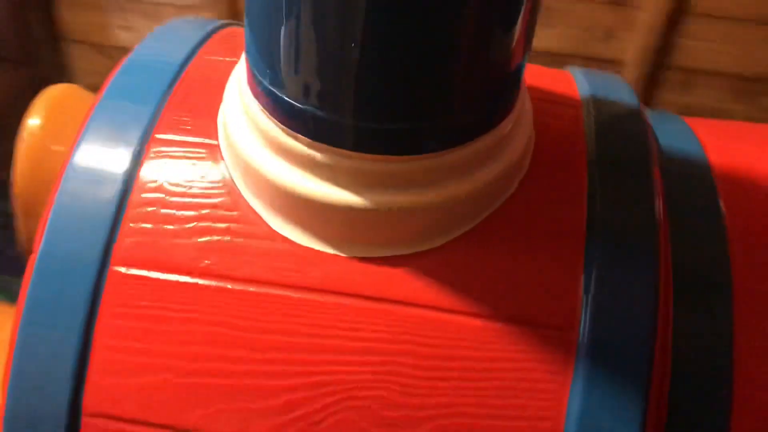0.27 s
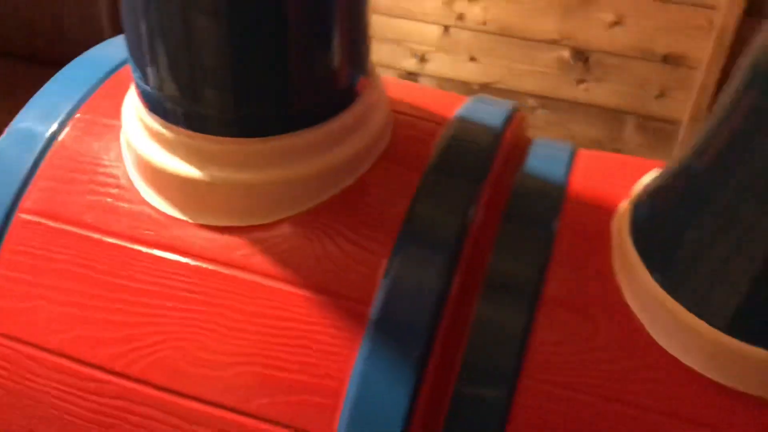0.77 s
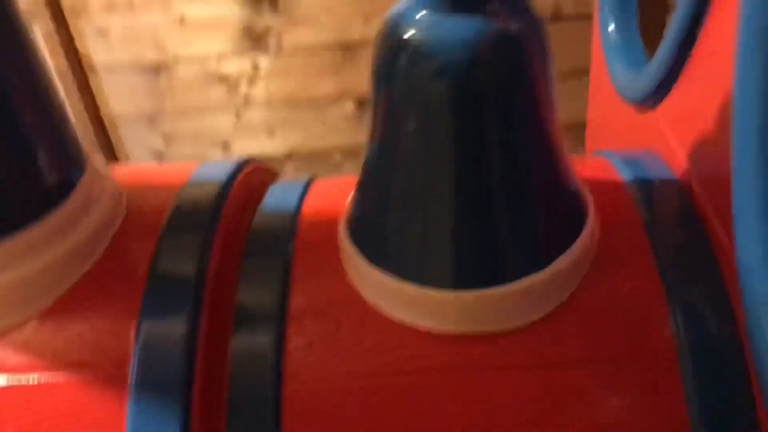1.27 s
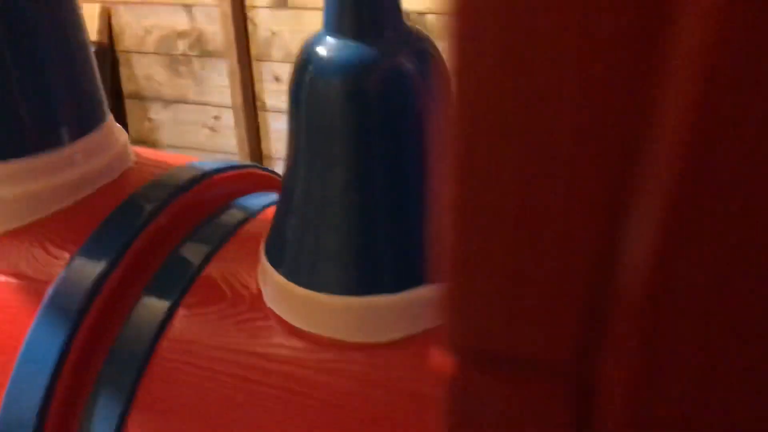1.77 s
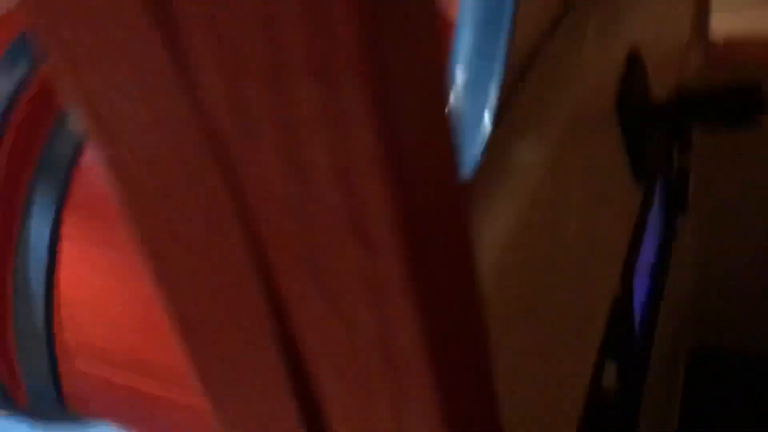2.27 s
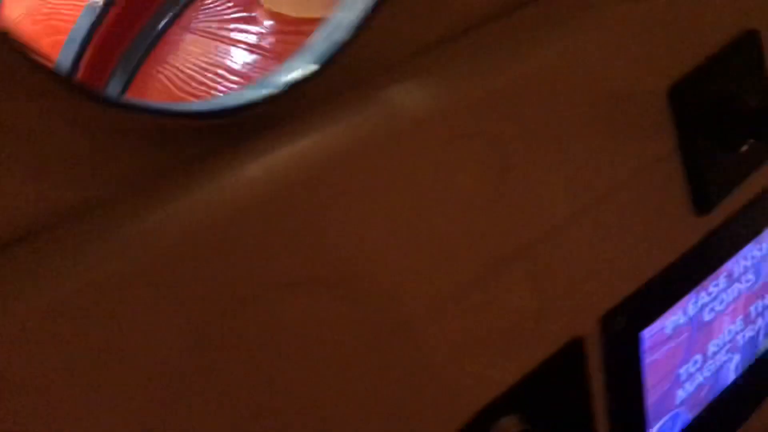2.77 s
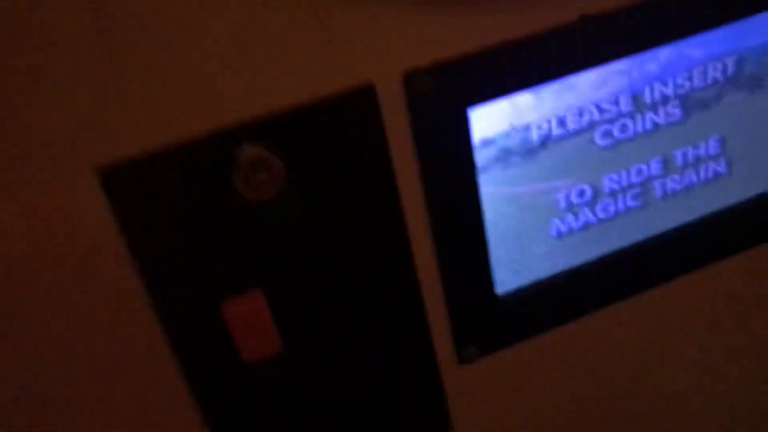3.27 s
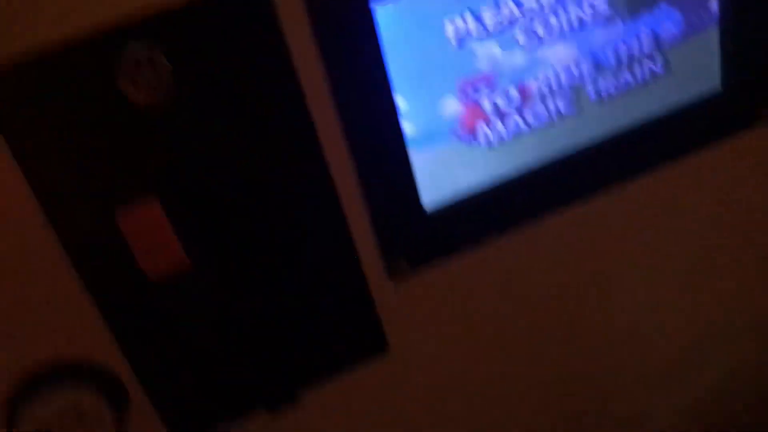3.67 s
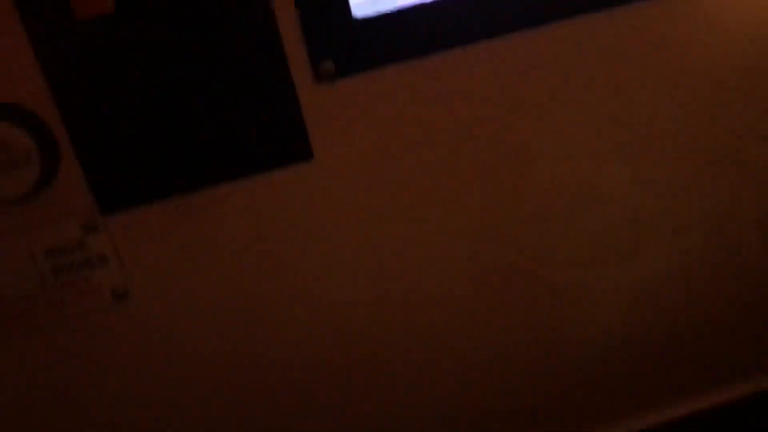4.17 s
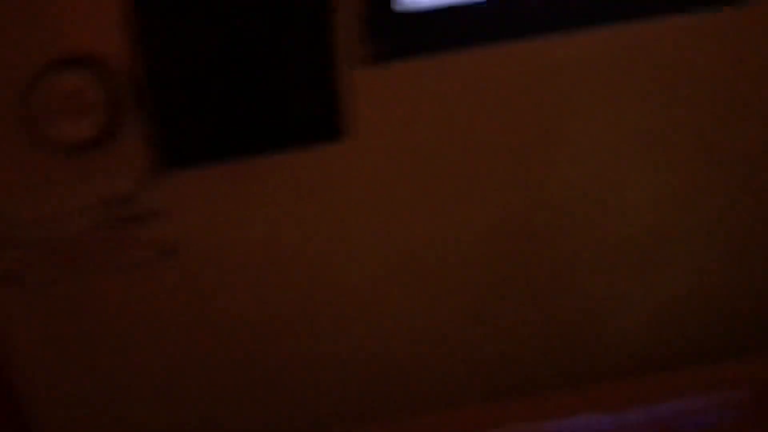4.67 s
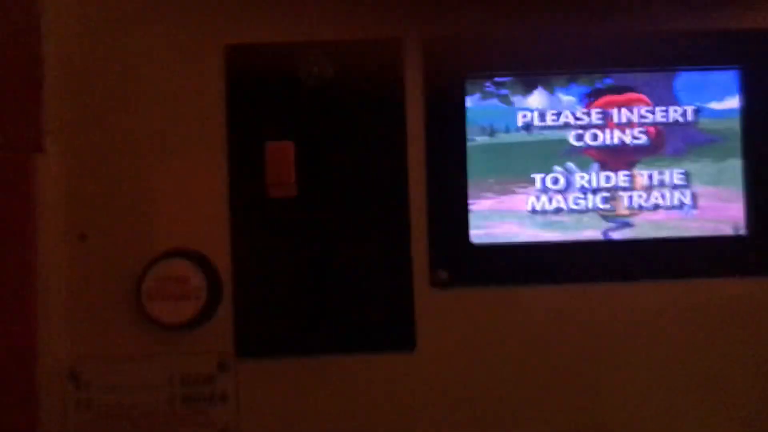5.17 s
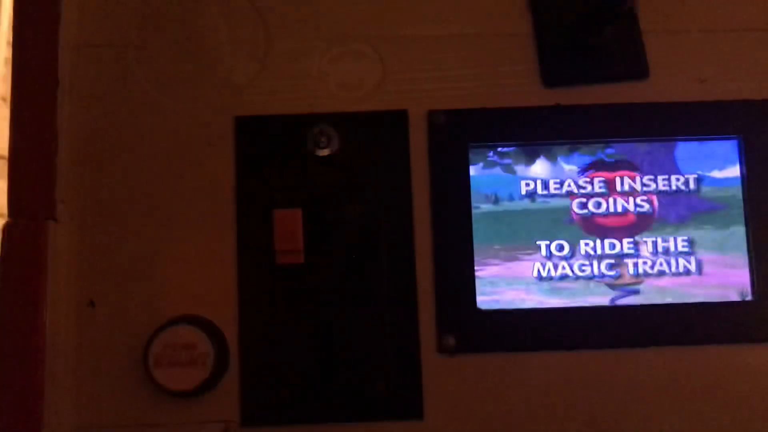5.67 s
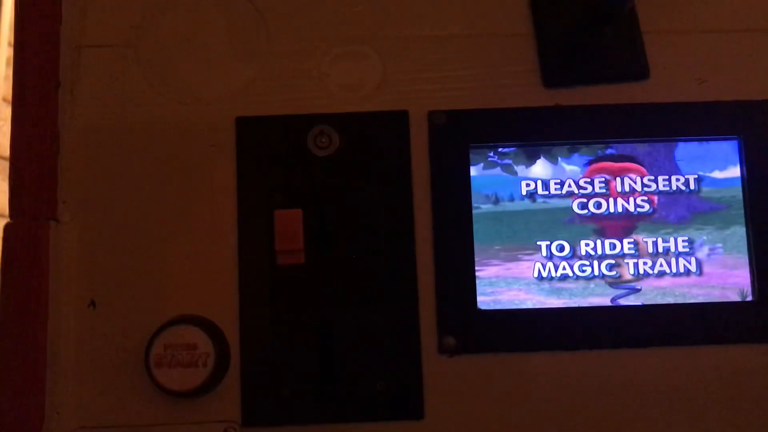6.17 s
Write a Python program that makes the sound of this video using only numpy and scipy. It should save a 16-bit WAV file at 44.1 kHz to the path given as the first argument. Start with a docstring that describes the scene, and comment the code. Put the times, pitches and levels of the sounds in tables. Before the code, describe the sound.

Close, hand-held indoor sound: irregular muffled footfalls with brisk hissing scuffs and small dry ticks over low handling rumble. The steps stop around halfway, leaving soft rubbing, a steady low mains hum and a tiny tap. Then a hollow plastic body is bumped several times, boomy and quickly damped, and struck once very hard with a bright click. It ends in quiet hum and airy hiss with faint slides.

```python
"""Someone walks round a hollow plastic ride in a wooden shed and climbs into its cab.
At first soles hiss and rub (flickering noise bands) and thud on the boards (dying sines with a crunch),
clothes rustle, dry ticks are noise bursts, and a low rumble and quiet air lie beneath.
A faint mains hum of steady tones grows clearer; a light falling-pitch tap comes through the plastic.
Then the shell is knocked, with two more taps among the knocks: its wall modes ring, loose parts rattle
and hands damp them. At the end a few faint slides, the hum and the air are left."""
import sys
import numpy as np
from scipy import signal
from scipy.fft import rfft, irfft, next_fast_len
from scipy.io import wavfile

SR = 44100
rng = np.random.default_rng(int(sys.argv[2]) if len(sys.argv) > 2 else 0)


def wav_record(signal):
    """Record a signal, one row per channel, as 16-bit PCM in the file named by sys.argv[1]."""
    frames = np.transpose(np.atleast_2d(signal))
    bounded = np.clip(frames, -1, 1)
    # unit amplitude maps onto the largest positive 16-bit level
    quanta = np.round(bounded * 32767).astype(np.int16)
    wavfile.write(sys.argv[1], SR, quanta)


N = 283254
HIT_S = .45   # time allowed for one step or knock


def from_db(db):
    """Decibels to gain."""
    return 10 ** (np.asarray(db) / 20)


def rms_one(x):
    """Scale to rms 1."""
    return x / np.sqrt(np.mean(x ** 2) + 1e-20)


def level(rows):
    """Gain in time, straight in decibels between (start_s, level_db) rows."""
    start_s, level_db = np.transpose(rows)
    return from_db(np.interp(np.arange(N) / SR, start_s, level_db))


def bandpass(x, low_hz, high_hz):
    """Keep the sound between two pitches."""
    return signal.sosfilt(signal.butter(2, [low_hz, high_hz], "band", fs=SR, output="sos"), x)


def drift(rate_hz):
    """Slow chance with spread 1: noise through a smooth low-pass, drawn at every 40th sample."""
    step = 40
    pole = np.exp(-2 * np.pi * rate_hz * step / SR)
    white = rng.standard_normal(N // step + 2002)
    slow = signal.lfilter([1], [1, -2 * pole, pole * pole], white)[2000:]   # skip the start-up
    return np.interp(np.arange(N) / step, np.arange(len(slow)), rms_one(slow))


def coloured(spectrum, patchy_db, rate_hz):
    """Noise in narrow bands, flickering partly together and partly each alone; rms 1."""
    hz, density_db = np.transpose(spectrum)
    bands = round(2.5 * np.log2(hz[-1] / hz[0]))
    edges = np.geomspace(hz[0], min(hz[-1], .45 * SR), bands)
    out, together, white = 0, drift(rate_hz), rng.standard_normal((2, N))
    for k, (low, high) in enumerate(zip(edges, edges[1:])):
        band = bandpass(white[k % 2], low, high)   # neighbours use different noise
        band_db = np.interp(np.log(low * high) / 2, np.log(hz), density_db)
        flicker_db = patchy_db * (together + 0.95 * drift(rate_hz))
        out = out + band * from_db(band_db + flicker_db)
    return rms_one(out)


def add(out, start_s, sound):
    """Mix a sound in at its time."""
    i = round(start_s * SR)
    out[i:i + len(sound)] += sound[:N - i]


def rumble():
    """The low rumble of a hand-held microphone and creaking boards: steady-coloured deep noise."""
    # rumble level: start_s, level_db
    rumble_level = [(0.0, -56), (0.34, -51), (0.55, -64.5), (0.92, -51.5), (1.2, -62), (1.43, -54.5),
                    (1.73, -61.5), (3.05, -62), (3.3, -52.5), (3.5, -63), (4.15, -61.5), (4.31, -58.5),
                    (4.5, -59), (4.79, -43), (5.27, -49), (5.6, -57), (6.42, -62)]
    # rumble spectrum: pitch_hz, relative density_db (per Hz)
    rumble_colour = [(12, -53), (20, 2), (65, 9), (167, -1), (203, -9.5), (226, 1.5), (260, 3), (340, -32),
                     (570, -120)]
    return level(rumble_level) * coloured(rumble_colour, patchy_db=0.0, rate_hz=2.6)


def hum():
    """Multiples of the mains frequency, wavering a little in level."""
    # hum level, clearer inside the cab: start_s, level_db
    hum_level = [(0, -73.5), (2.3, -71), (2.8, -66.5), (4.4, -60.5), (5.6, -63.5), (6.42, -66.5)]
    # hum tones: pitch_hz, relative level_db
    hum_lines = [(100, -26), (200, -2), (300, -21.5), (600, -24)]
    t = np.arange(N) / SR
    tones = 0
    for hz, db in hum_lines:
        waver = from_db(db + drift(0.97))
        tones = tones + np.sqrt(2) * waver * np.sin(2 * np.pi * hz * t)
    return level(hum_level) * tones


def air():
    """The quiet noise of the shed, rising and sinking a little."""
    # air level: start_s, level_db
    air_level = [(0.0, -62.5), (0.7, -73), (0.93, -66.5), (1.56, -58.5), (1.8, -65), (2.3, -59.5),
                 (2.64, -63.5), (4.43, -62.5), (5.3, -60)]
    # air level near the end: start_s, level_db
    seated_level = [(5.55, -59), (6.42, -58)]
    # air spectrum: pitch_hz, relative density_db (per Hz)
    air_colour = [(35, -36), (60, -36), (130, -24), (202, 1.5), (250, -16.5), (301, -14), (458, -2.5),
                  (566, -3), (698, -4.5), (1440, -7), (3190, -14), (7750, -55), (14900, -39.5),
                  (16000, -38)]
    return level(air_level + seated_level) * coloured(air_colour, patchy_db=1.4, rate_hz=3)


def scuffs():
    """Soles and cloth slide: each slide swells and fades, the dull rub lasting longer than the bright hiss."""
    # slides: loudest_s, hiss_db, rub_db, rise_ms, fall_ms (rise and hiss fall span 20 dB)
    slides = [(.06, -70, -58.5, 29, 220), (.26, -71, -54, 63, 96), (.49, -56, -55.5, 127, 73),
              (0.747, -48.5, -49, 21, 123), (.90, -57.5, -56.5, 30, 330), (1.062, -41, -48.5, 108, 77),
              (1.21, -62, -59, 14, 60), (1.37, -57.5, -53, 29, 29), (1.425, -56, -57, 40, 51),
              (1.54, -75, -57, 130, 110), (1.689, -49.5, -66, 35, 56), (1.912, -43.5, -47.5, 31, 80),
              (2.16, -64.5, -61, 110, 220), (2.291, -45, -52, 96, 127), (2.39, -57.5, -77, 69, 160),
              (2.47, -57.5, -67, 91, 37), (2.79, -82, -63, 54, 15), (3.049, -58, -58, 69, 42),
              (3.186, -54, -50.5, 52, 77), (3.65, -72, -57, 310, 55), (4.04, -77, -56.5, 15, 60),
              (4.14, -68, -57, 100, 87), (4.43, -75, -76, 14, 79), (6.19, -74, -78, 30, 23),
              (6.4, -65, -77, 80, 100)]
    # faint treble hiss beneath the slides: start_s, level_db
    hiss_level = [(0.0, -70.5), (2.3, -68), (2.57, -72.5), (3.09, -67), (4.24, -71.5), (5.18, -70),
                  (5.4, -77.5), (5.61, -66), (6.42, -64.5)]
    # bright hiss spectrum: pitch_hz, relative density_db (per Hz)
    hiss_colour = [(1290, -5), (2200, -3), (2750, -3), (3900, -5), (4840, -4.5), (5760, -8), (8870, -9.5),
                   (10600, -6), (13100, -7), (16000, -15)]
    # dull rub and rustle spectrum: pitch_hz, relative density_db (per Hz)
    rub_colour = [(210, -39), (350, -2), (432, -7.5), (571, -8.5), (797, -7), (1350, -6), (1540, -8),
                  (1990, -12), (2370, -16), (3870, -21.5), (5000, -25), (6500, -66), (11000, -120)]
    rustle_db, rub_lingers = -63.5, 2.1   # steady rustle of clothes; stretch of the rub's fall
    ms = 1000 * np.arange(N) / SR
    bright, dull = level(hiss_level), from_db(rustle_db)
    for loudest_s, hiss_db, rub_db, rise_ms, fall_ms in slides:
        late_ms = ms - 1000 * loudest_s
        hiss_drop_db = 20 * np.maximum(-late_ms / rise_ms, late_ms / fall_ms)
        rub_drop_db = 20 * np.maximum(-late_ms / rise_ms, late_ms / (rub_lingers * fall_ms))
        bright = np.hypot(bright, from_db(hiss_db - hiss_drop_db))   # powers add
        dull = np.hypot(dull, from_db(rub_db - rub_drop_db))
    hiss = bright * coloured(hiss_colour, patchy_db=.8, rate_hz=25)
    return hiss + dull * coloured(rub_colour, patchy_db=2.2, rate_hz=25)


def hollows(x):
    """Hollows colour a noise by adding narrow resonances."""
    # hollows: pitch_hz, width_hz, level_db
    resonances = [(550, 52, 2), (1363, 117, -9.5)]
    out = x
    for hz, width_hz, db in resonances:
        out = out + from_db(db) * signal.lfilter(*signal.iirpeak(hz, hz / width_hz, fs=SR), x)
    return out


def thud(modes, peak_db, reach, rise_ms, ring):
    """All modes of a body swell over the contact time and die; reach says how hard each is driven."""
    hz, db, t60_s = (column[:, None] for column in np.transpose(modes))
    t = np.arange(round(HIT_S * SR)) / SR
    rise_s = max(rise_ms, .2) / 1000 + 0.3 / hz   # low modes take longer to build up
    swell = (1 - np.exp(-t / rise_s)) ** 2
    decay = from_db(db - 60 * t / (ring * t60_s))
    sound = np.sum(swell * reach * decay * np.sin(2 * np.pi * hz * t), axis=0)
    sound *= np.cos(np.pi / 2 * (t / t[-1]) ** 2)   # nothing is left ringing at the end
    return from_db(peak_db) * sound / np.abs(sound).max()


def steps():
    """Soft soles set floorboards thudding and crunch a little; modes near the strongest pitch are driven most."""
    # footfalls: start_s, thud peak_db, strongest pitch_hz, ring-time factor
    footfalls = [(0.184, -43, 88, .5), (0.248, -36, 300, 1), (0.727, -41.5, 284, 0.83),
                 (0.787, -29, 284, 0.21), (0.805, -36, 264, 0.63), (0.999, -42.5, 285, .7),
                 (1.068, -35, 158, 0.79), (1.273, -48.5, 77.5, 0.31), (1.402, -36, 149, 0.33),
                 (1.425, -35, 194, 0.68), (1.498, -43.5, 157, .3), (1.883, -38.5, 197, 1),
                 (1.903, -41, 186, 0.51), (1.944, -31.5, 227, 0.62), (1.962, -32.5, 255, 0.73),
                 (2.504, -38.5, 179, 0.52), (2.521, -31, 183, 0.58), (2.539, -32.5, 181, 1),
                 (3.168, -30.5, 82, 0.81), (3.249, -39.5, 156, 0.82), (3.281, -40.5, 167, 0.6)]
    # floorboard modes: pitch_hz, relative level_db, t60_s (before the ring-time factor)
    boards = [(74, -17, 0.3), (84.2, -8, 0.29), (143, 1.5, 0.1), (170.5, -3.5, 0.33), (206, -3.5, 0.14),
              (242.8, -6, 0.31), (291.5, -5, 0.27), (325.5, -3, 0.14), (410.6, -15.5, 0.65),
              (597, -3.5, 0.31), (644, 6, 0.068)]
    grit_low_hz, grit_high_hz, grit_db, grit_t60_s = 404, 1390, -24.5, 0.049   # dB against the thud peak
    rise_ms = 2.25
    out, hz = np.zeros(N), np.array(boards)[:, :1]
    t = np.arange(round(HIT_S * SR)) / SR
    shape = (len(footfalls), len(hz), 1)
    chance = from_db(rng.normal(0, 1.5, shape)) * rng.choice([-1, 1], shape)
    grits = rms_one(bandpass(rng.standard_normal((len(footfalls), len(t))), grit_low_hz, grit_high_hz))
    for (start_s, db, centre_hz, ring), luck, grit in zip(footfalls, chance, grits):
        reach = luck * from_db(-9 * np.log2(hz / centre_hz) ** 2)
        add(out, start_s, thud(boards, db, reach, rise_ms, ring))
        add(out, start_s, grit * from_db(db + grit_db - 60 * t / grit_t60_s))
    return out


def ticks():
    """Dry ticks and cracks: fast-dying bursts of noise, band-passed."""
    # ticks: start_s, peak_db, low_hz, high_hz, t60_ms (of the noise ahead of its filter)
    bursts = [(0.214, -43, 900, 2490, 76), (0.732, -43.5, 1500, 16000, 110), (0.788, -42, 500, 3000, 12),
              (1.075, -35, 1010, 1700, 60), (1.352, -42, 450, 1500, 60), (1.898, -40, 2500, 16100, 36),
              (3.9922, -44, 7200, 16000, 13), (4.5505, -41.5, 395, 6900, 5.4),
              (4.641, -44.5, 1490, 16000, 20), (4.799, -49.5, 3930, 16000, 10),
              (4.8507, -49, 1500, 5000, 20), (4.861, -39.5, 5000, 16100, 5), (5.052, -55, 3000, 8000, 15),
              (5.063, -61, 3000, 8000, 8.1), (5.0784, -37.5, 3420, 12000, 2.6),
              (5.161, -54, 3000, 6000, 29), (5.2494, -52, 800, 4000, 65), (5.2607, -31, 984, 16000, 20),
              (5.264, -8, 2350, 15800, 2.2), (5.2651, -8.5, 2500, 16100, 1.1),
              (5.2964, -49, 1000, 7960, 30)]
    out, t = np.zeros(N), np.arange(4000) / SR
    whites = rng.standard_normal((len(bursts), len(t)))
    for (start_s, db, low_hz, high_hz, t60_ms), white in zip(bursts, whites):
        burst = bandpass(white * from_db(-60 * 1000 * t / t60_ms), low_hz, high_hz)
        add(out, start_s, from_db(db) * burst / np.abs(burst).max())
    return out


def shed(x):
    """Ten feedback delays, duller on every round; the thin walls let the bass out."""
    t60_s = 0.53   # for the bass; the treble dies sooner
    wall_cut_hz, leak_hz = 910, 310   # dulling per 20 ms of path; bass lost below
    size = next_fast_len(N + SR, real=True)
    hz = np.fft.rfftfreq(size, 1 / SR)
    echo = 0
    for k, lag_s in enumerate(np.geomspace(.0071, .029, 10)):
        dulling = 1 + 1j * hz / wall_cut_hz * lag_s / .02
        loop = from_db(-60 * lag_s / t60_s) / dulling * np.exp(-2j * np.pi * hz * lag_s)
        echo = echo + (-1) ** k * loop / (1 - loop)
    for lag_s in (.0013, .0031):
        turn = np.exp(-2j * np.pi * hz * lag_s)   # rough boards smear each echo
        echo = echo * (turn - .6) / (1 - .6 * turn)
    leak = 1j * hz / (leak_hz + 1j * hz)
    return irfft(rfft(x, size) * echo * leak, size)[:N]


def near_wall(x):
    """Inside the cab a nearby wall throws a dull echo back over a short, changing detour."""
    # wall echo: start_s, detour_m, share thrown back (0-1); none outside these times
    wall = [(2.9, 0.32, 0.13), (3.35, 0.32, 0.27), (3.8, 0.23, 0.25), (4.15, 0.17, 0.3), (4.45, 0.2, .02)]
    start_s, detour_m, share = np.transpose(wall)
    t = np.arange(N) / SR
    delay_s = np.interp(t, start_s, detour_m) / 343   # speed of sound in m/s
    dull = signal.lfilter(*signal.butter(1, 2500, fs=SR), x)
    echo = np.interp(t - delay_s, t, dull)
    share = np.clip(np.interp(t, start_s, share, left=0, right=0), 0, 1)
    return (x + share * echo) / np.sqrt(1 + share ** 2)


def taps():
    """Bending waves spread out in the plastic: the pitch falls fast as the tap dies; grit roughens it."""
    # light taps: start_s, peak_db, first pitch_hz, pitch halving_ms, t60_ms
    light_taps = [(3.7555, -35, 1680, 0.67, 180), (5.1482, -34, 2263, 1.8, 73),
                  (5.2202, -33, 2200, 1.8, 36)]
    out, ms = np.zeros(N), 1000 * np.arange(3000) / SR
    white = rng.standard_normal((len(light_taps), len(ms)))
    grits = rms_one(signal.lfilter(*signal.butter(3, 1800, fs=SR), white))
    for (start_s, db, first_hz, half_ms, t60_ms), grit in zip(light_taps, grits):
        phase = 2 * np.pi * np.cumsum(first_hz / (1 + ms / half_ms)) / SR
        rough = np.sin(phase) + .8 * grit * np.exp(-ms / 6)
        chirp = rough * (1 - np.exp(-ms / .8)) * from_db(-60 * ms / t60_ms)
        add(out, start_s, from_db(db) * chirp / np.abs(chirp).max())
    return out


def knocks():
    """The place struck decides how far each shell mode is reached; loose parts rattle; hands damp the ring."""
    # knocks: start_s, peak_db (before flexing and damping), rise_ms, ring-time factor,
    #   place along the wall (0-1), then against the lower wall modes:
    #   deep_db, boom_db, middle_db, upper_db, rim_db
    blows = [(4.640, -10, 0.96, 1.07, 0.28, -31, 0.5, 9.5, -5, -16),
             (4.8479, -15.5, .5, 1.5, .4, -1, 2, 5, -3.5, -5),
             (4.872, -15.5, 1.3, 0.32, 0.1, -31, -3, -8, -15, -2.5),
             (4.921, -22.5, 0.46, 0.68, 0.29, -7, 2.5, 0, -6, -28),
             (5.052, -35.5, 1.6, 0.98, 0.28, -8, -40, 0, 1, 7.5),
             (5.09, -36.5, 2.2, 0.47, 0.32, -12, 14, -11, -1, -7.5),
             (5.158, -40, 1.4, 0.64, 0.39, -9, -13.5, -16, -5.5, 14),
             (5.245, -31.5, 3.94, 1.6, 0.33, -4, -9, 14.5, -8.5, 1),
             (5.261, -5, 0.37, 1.09, 0.744, -1.5, 5, -19, 4.5, 1),
             (5.289, -17, 1.2, 1.57, 0.314, -10.5, 7.5, -3.5, 0.5, -24),
             (5.455, -39, 6, 1.46, 0.25, -37, 25, -14, -1, -16)]
    # shell modes: pitch_hz, relative level_db, t60_s (before the ring-time factor)
    shell = [(63, 0, 0.14), (87, 8, 0.17), (127.2, -0.5, 0.25), (152, -1, 0.33), (157.5, 6.5, 0.67),
             (202.3, -5.5, 0.44), (244.5, 5.5, 0.087), (276.1, 7.5, 0.12), (298.2, -5, 0.31),
             (315, 15.5, 0.058), (375, 5.5, 0.19), (378.8, 7, 0.13), (411, 1.5, 0.15), (468, -3.5, 0.083),
             (467, 9.5, 0.11), (523.2, 4.5, 0.16), (570, -15, 0.26), (623, 8, 0.1), (694, -30.5, .12),
             (914, 0, 0.039), (1070, -38.5, 0.11), (1374, -13, 0.15), (1880, -29.5, .1), (2170, -69.5, .06),
             (2850, -52.5, .05)]
    # centres of the deep, boom, lower, middle, upper wall and rim modes: pitch_hz
    families_hz = [75, 158, 290, 450, 620, 1100]
    # a hand settles on the wall and damps what still rings: start_s, damping_db
    hands = [(4.737, -10), (4.907, -3), (5.379, -8), (5.69, -10)]
    hand_settles_s = .008
    rattle_low_hz, rattle_high_hz = 690, 2170
    rattle_db, rattle_t60_s = -19, 0.041   # t60 before the ring-time factor
    tail_db, tail_t60_s = -46.5, 0.5   # loose parts buzz on more softly
    flex_share, flex_hz = 0.27, 71   # the flexing wall makes each ring unsteady
    out, hz = np.zeros(N), np.array(shell)[:, :1]
    shape = np.arange(1, len(shell) + 1)[:, None]
    t = np.arange(round(HIT_S * SR)) / SR
    size = (len(blows), len(t))
    rattles = rms_one(bandpass(rng.standard_normal(size), rattle_low_hz, rattle_high_hz))
    flexes = rms_one(signal.lfilter(*signal.butter(2, flex_hz, fs=SR), rng.standard_normal(size)))
    for blow, rattle, flex in zip(blows, rattles, flexes):
        start_s, db, rise_ms, ring, place, deep_db, boom_db, middle_db, upper_db, rim_db = blow
        families_db = [deep_db, boom_db, 0, middle_db, upper_db, rim_db]
        family_db = np.interp(np.log(hz), np.log(families_hz), families_db)
        reach = from_db(family_db) * (0.5 * np.cos(np.pi * shape * place) + (-1.) ** shape)
        sound = thud(shell, db, reach, rise_ms, ring) * (1 + flex_share * flex)
        fade = from_db(rattle_db - 60 * t / (ring * rattle_t60_s))
        fade = fade + from_db(tail_db - 60 * t / tail_t60_s)
        sound = sound + rattle * from_db(db + rim_db) * fade
        damp_db = 0
        for hand_s, hand_db in hands:
            if hand_s > start_s:
                damp_db = damp_db + hand_db * np.clip((start_s + t - hand_s) / hand_settles_s, 0, 1)
        add(out, start_s, sound * from_db(damp_db))
    return out


def scene():
    """Hits with their room, sliding noises, rumble, hum and the quiet air."""
    shed_db = -23.5
    hits = steps() + ticks() + taps() + knocks()
    room = from_db(shed_db) * shed(hits)
    noises = near_wall(hollows(scuffs() + air()))
    return (hits + room + noises + rumble() + hum())[None]


def record(dry):
    """The microphone loses the deepest bass and dips in the treble; the top is cut."""
    low_hz, top_hz = 40.4, 16600
    dip_hz, dip_width_hz, dip_share = 10400, 2200, 0.52
    thin = signal.lfilter(*signal.butter(2, low_hz, "high", fs=SR), dry)
    thin = thin - dip_share * signal.lfilter(*signal.iirpeak(dip_hz, dip_hz / dip_width_hz, fs=SR), thin)
    return signal.sosfilt(signal.cheby2(14, 70, top_hz, fs=SR, output="sos"), thin)


dry = scene()
out = record(dry)
wav_record(out)
```